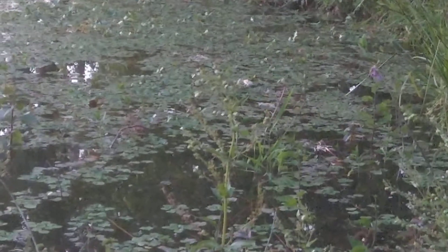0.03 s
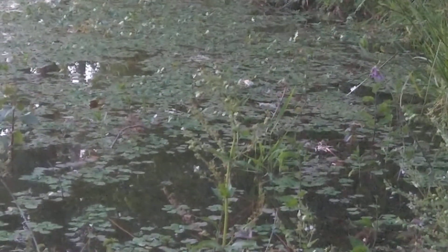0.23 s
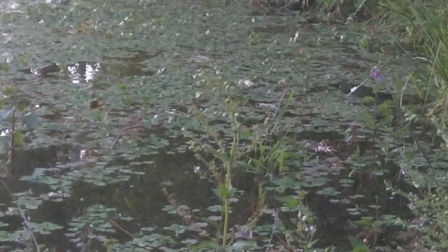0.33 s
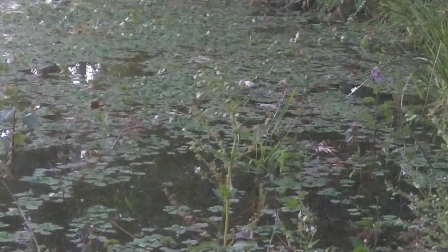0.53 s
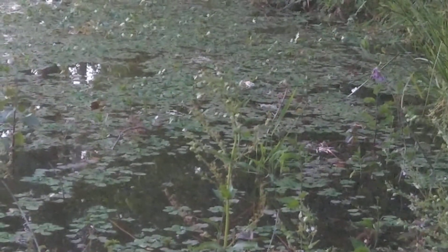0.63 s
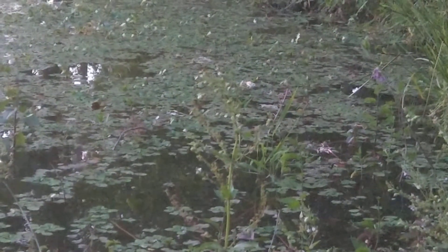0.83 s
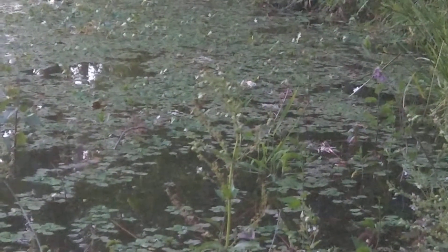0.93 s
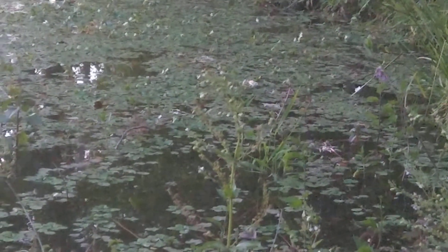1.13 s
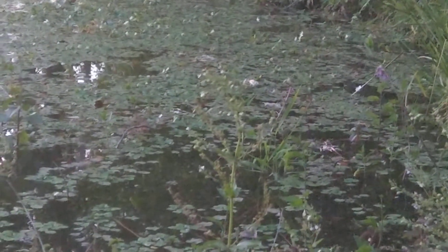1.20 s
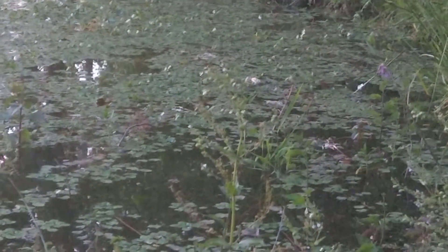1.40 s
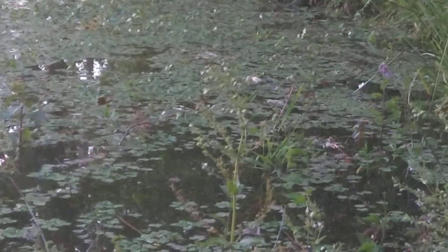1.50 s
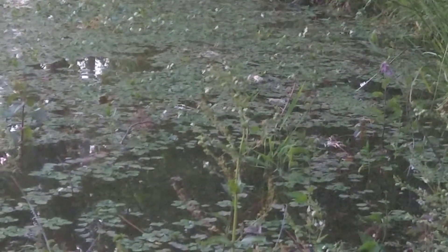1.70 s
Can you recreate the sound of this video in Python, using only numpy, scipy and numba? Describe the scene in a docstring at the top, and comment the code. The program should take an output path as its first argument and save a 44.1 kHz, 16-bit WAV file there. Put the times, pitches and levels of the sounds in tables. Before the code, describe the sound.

A frog croaks twice at the edge of a pond, each croak slowing from a buzz into harsh throbs. Other frogs give brief calls farther off, while faint crickets trill over soft outdoor air.

```python
"""Frog at the edge of a pond

A frog croaks twice: clicks of its larynx ring a throat and a vocal sac whose note rises and sinks,
and each croak slows from a buzz into a few harsh throbs. Other frogs answer farther off, crickets
trill in the reeds, soft air and a faint low hum run underneath, and the banks return a short echo."""
import sys
import numpy as np
from scipy import signal
from scipy.fft import rfft, irfft
from scipy.io import wavfile
from scipy.ndimage import uniform_filter1d, map_coordinates
from numba import njit

SR = 44100
rng = np.random.default_rng(int(sys.argv[2]) if len(sys.argv) > 2 else 0)


def int16_out(signal):
    """Quantize to a 16-bit WAV file."""
    q = np.round(np.clip(np.atleast_2d(signal).T, -1, 1) * 32767)
    wavfile.write(sys.argv[1], SR, q.astype(np.int16))


N = 77175
TIME = np.arange(N) / SR


def undb(db):
    return 10 ** (np.asarray(db) / 20)


def unit(x):
    """Scale to rms 1."""
    return x / np.sqrt(np.mean(x ** 2) + 1e-18)


def curve(rows, column=1):
    """One column of a table, joined by straight lines in time."""
    rows = np.array(rows, float)
    return np.interp(TIME, rows[:, 0], rows[:, column])


def on_bins(points, size):
    """A spectrum table read at the bins of a transform."""
    hz, value = np.array(points, float).T
    return np.interp(np.log(np.fft.rfftfreq(size, 1 / SR) + 1), np.log(hz), value)


def colour(x, points, size=4096):
    """Minimum-phase EQ through the given (Hz, dB) points."""
    cepstrum = irfft(np.log(undb(on_bins(points, size))))
    cepstrum[1:size // 2] *= 2
    cepstrum[size // 2 + 1:] = 0
    impulse = irfft(np.exp(rfft(cepstrum)))
    return signal.fftconvolve(x, impulse)[:len(x)]


@njit
def swept_bandpass(x, hz, width):
    """State-variable band-pass with a moving centre."""
    y, band, low = np.empty(len(x)), 0., 0.
    for i in range(len(x)):
        g, damping = np.tan(np.pi * hz[i] / SR), width[i] / hz[i]
        v = (band + g * (x[i] + 1e-18 - low)) / (1 + g * (g + damping))
        band, low = 2 * v - band, low + 2 * g * v
        y[i] = damping * v
    return y


def ring(x, hz, width):
    """A resonance with a steady or moving frequency and width."""
    return swept_bandpass(x, hz * np.ones(N), width * np.ones(N))


def drift(rate_hz):
    """Smooth random motion at rms 1."""
    lowpass = signal.butter(2, rate_hz, fs=SR, output="sos")
    return unit(signal.sosfilt(lowpass, rng.standard_normal(2 * N))[N:])


def place(x, pan_db, lag_s=0):
    """Two ears: the left one louder by pan_db and later by lag_s."""
    late = map_coordinates(x, [np.arange(N) - lag_s * SR], mode="nearest")
    return np.array([late * undb(pan_db / 2), x * undb(-pan_db / 2)])


def level_out(x, size=440):
    """Even out a ringing pulse train to about rms 1."""
    power = uniform_filter1d(uniform_filter1d(x ** 2, size), size // 2)
    return x / np.sqrt(np.abs(power) + power.max() / 1000)


# Tone of the open air. Each row: frequency in Hz, relative level in dB.
AIR_EQ = [(15, -21), (32, -4), (60, 3.5), (120, -3), (250, -6), (450, -6), (750, -3.5), (1100, -3),
          (1700, 0.5), (2300, -7.5), (3200, -20), (4400, -14.5), (5500, -21.5), (10000, -21), (14000, -33)]
# Stereo image of the air. Each row: frequency in Hz, likeness of the two ears from 0 to 1.
AIR_LIKENESS = [(50, 0.8), (500, 0.8), (1500, 0.48), (3000, 0.35), (8000, 0.07)]


def air(level_db=-60):
    """A soft bed of outdoor noise, narrow in the bass and wide on top."""
    alike = np.clip(on_bins(AIR_LIKENESS, N), 0, 1)
    tone = undb(on_bins(AIR_EQ, N))
    mid, side = (irfft(rfft(rng.standard_normal(N)) * tone * np.sqrt(share), N)
                 for share in (1 + alike, 1 - alike))
    return np.array([mid + side, mid - side]) / np.std(mid) * undb(level_db + .5 * drift(4))


# Partials of the hum. Each row: harmonic number, level in dB.
HUM_PARTIALS = [(1, -68), (2, -80), (3, -91)]


def hum(hz=39.1, wander=.02):
    """A faint, wavering low hum, like an engine far away."""
    phase = 2 * np.pi * np.cumsum(hz * (1 + wander * drift(2.1))) / SR
    return sum(-undb(db + .5 * drift(6.5)) * np.sqrt(2) * np.cos(harmonic * phase)
               for harmonic, db in HUM_PARTIALS)


# Solo crickets. Each row: note in Hz, first and last strokes per second, fall over a stroke in Hz,
# base level in dB, leftward pan in dB.
CRICKET_VOICES = [(6710, 55, 53, 515, -68, 0), (7233, 53, 52, 820, -71, 3)]
# Cricket faders. Each row: time in seconds, gain on the solo trills in dB, chorus level in dB.
CRICKET_FADERS = [(0, -16, -61.5), (.45, 1.5, -62), (.75, 1, -69), (1.1, 1.5, -68.5), (1.35, -0.5, -75),
                  (1.55, -7, -79), (1.75, -3.5, -81)]
# Tone of the blurred chorus. Each row: frequency in Hz, relative level in dB.
CHORUS_EQ = [(5400, -47), (6000, -18), (6350, -12), (6800, -5), (7400, -8.5), (7800, -79), (8300, -31.5)]


def crickets(stroke_width=.2, bandwidth_hz=260):
    """Each wing stroke is a scratchy falling note; many more blur into a hiss."""
    chorus = np.array([unit(colour(rng.standard_normal(N), CHORUS_EQ)) for _ in range(2)])
    out = chorus * undb(curve(CRICKET_FADERS, column=2))
    for hz, first_rate, last_rate, fall_hz, db, pan_db in CRICKET_VOICES:
        cycles = np.cumsum(np.linspace(first_rate, last_rate, N)) / SR + rng.random()
        stroke = cycles % 1 - .5
        phase = 2 * np.pi * np.cumsum(hz - fall_hz * stroke) / SR
        gate = np.exp(-.5 * (stroke / stroke_width) ** 2)
        for ear, ear_db in enumerate((pan_db / 2, -pan_db / 2)):
            scratch = drift(bandwidth_hz / 2) * np.cos(phase) + drift(bandwidth_hz / 2) * np.sin(phase)
            out[ear] += unit(gate * scratch) * undb(db + ear_db + curve(CRICKET_FADERS))
    return out


def larynx(start, end, hz, jitter, shimmer_db):
    """One click per cycle, each with its own period and strength."""
    out, at = np.zeros(N), max(start, 0)
    for late, strong in rng.standard_normal(size=(200, 2)):
        i = int(at * SR)
        if at > end or i >= N:
            break
        taps = np.clip(i + np.arange(-7, 9), 0, N - 1)
        offset = taps - at * SR
        click = np.sinc(offset) * np.sinc(offset / 8)  # can land between samples
        out[taps] -= click * undb(shimmer_db[i] * strong)
        at += np.exp(jitter[i] * late) / hz[i]
    return out


# Distant croaks. Each row: start and length in seconds, first and last pulse rate in Hz, first and last
# sac note in Hz, sac bandwidth in Hz, level in dB, throat against sac in dB, leftward pan in dB.
FAR_CROAKS = [ (-.012, 0.028, 275, 268, 1570, 1520, 260, -46, -16.5, 9.5),
              (0.017, 0.033, 285, 264, 1560, 1540, 260, -47.5, -16, 4.5),
              (0.161, 0.029, 624, 788, 2560, 3850, 2500, -57, -2.5, 5),
              (0.563, 0.039, 462.5, 465, 1400, 1640, 500, -54.5, -6.5, 8.5),
              (1.008, 0.026, 330.5, 337, 1648, 1816, 600, -61.5, -8, 12),
              (1.098, 0.06, 213.5, 260, 1210, 1543, 129.4, -52, -10, 8),
              (1.126, 0.037, 495.4, 481, 2130, 2260, 299, -59, -0.5, 3),
              (1.326, 0.1, 350, 404.6, 970, 1200, 503, -57.5, -21, 0),
              (1.366, 0.046, 268, 291, 1380, 1750, 580, -53, -4, 2),
              (1.634, .11, 350.3, 382, 2040, 2330, 162, -62.5, -6, 6)]
# Their throat tone, thin in the bass. Each row: frequency in Hz, relative gain in dB.
FAR_THROAT_EQ = [(250, -37), (480, -1), (600, -17.5), (780, 4), (1100, -10.5), (1600, -8), (3000, -59),
                 (6000, -37.5)]


def far_frogs(jitter=.0267, shimmer_db=2.25, skirt_hz=1200):
    """Short gliding croaks: clicks ring a sac and a throat under a single swell."""
    out = 0
    for start, length, hz0, hz1, sac0, sac1, width, db, throat_db, pan_db in FAR_CROAKS:
        end = start + length
        pulse_hz = curve([(start, hz0), (end, hz1)])
        clicks = larynx(start, end, pulse_hz, np.full(N, jitter), np.full(N, shimmer_db))
        sac_hz = curve([(start, sac0), (end, sac1)])
        sac = level_out(ring(ring(clicks, sac_hz, width), sac_hz, skirt_hz))
        throat = undb(throat_db) * level_out(colour(clicks, FAR_THROAT_EQ))
        progress = np.clip((TIME - start) / length, 0, 1)
        swell = np.sqrt(np.abs(np.sin(np.pi * progress)))
        out += place((sac + throat) * swell * undb(db), pan_db)
    return out


# Steady resonances beside the sac's note. Each row: frequency in Hz, bandwidth in Hz, gain in dB.
SAC_MODES = [(1400, 170, -11), (1660, 80, -6), (2300, 220, -16), (2830, 160, -25)]
# What the skin of the sac lets out. Each row: frequency in Hz, relative gain in dB.
SKIN_EQ = [(500, -16.5), (1050, -3.5), (1350, 4.5), (1700, 3), (2200, -0.5), (2600, -12), (3000, -7),
           (3500, -8), (5500, -51)]


def vocal_sac(clicks, note_hz, drive, rest_hz=1570, rest_width_hz=90, rest_skirt_hz=1200):
    """The sac rings on a gliding note through its skin; the ring gets shorter as the note rises."""
    rise = note_hz / rest_hz
    note = ring(clicks, note_hz, rest_width_hz * rise ** 3.1)
    modes = sum(undb(db) * ring(clicks, hz, width) for hz, width, db in SAC_MODES)
    voiced = level_out(colour(note + modes, SKIN_EQ)) * drive
    return ring(voiced, note_hz, rest_skirt_hz * rise)


# Tone of the upper buzz. Each row: frequency in Hz, relative gain in dB.
BUZZ_EQ = [(1500, -34), (2700, 1.5), (3300, -7), (4000, 3), (4450, 14.5), (4750, 0.5), (5200, -16),
           (9000, -48), (14000, -44)]


def upper_buzz(clicks, drive, level_db=-56, at_drive_db=-33, growth=.91):
    """A thin, bright edge on the clicks that follows the smoothed drive of the sac."""
    swell = (uniform_filter1d(drive, 1500) / undb(at_drive_db)) ** growth
    return level_out(colour(clicks, BUZZ_EQ)) * undb(level_db) * swell


# Throbs that end the croaks. Each row: centre and half length in seconds, sac and throat drive in dB.
CROAK_THROBS = [(0.389, 0.0062, -30.5, -44), (0.398, 0.0081, -29, -50.5), (.429, 0.005, -26, -38),
                (0.44, 0.002, -26, -41.5), (.451, 0.0015, -26, -37.5), (.467, 0.0024, -33, -37.5),
                (.848, 0.0083, -28, -43), (0.888, 0.0082, -28.5, -43), (0.927, 0.0054, -28.5, -44.5),
                (0.941, 0.0083, -36.5, -43)]


def effort(swell, column):
    """A croak's slow swell with the closing throbs on top: column 1 drives the sac, 2 the throat."""
    throb_power = 0
    for centre, half_length, *drive_db in CROAK_THROBS:
        bump = np.exp(-.5 * ((TIME - centre) / half_length) ** 2)
        throb_power += (undb(drive_db[column - 1]) * bump) ** 2
    return np.sqrt(undb(curve(swell, column)) ** 2 + throb_power)


# Pitch of the near frog, one list per croak. Each row: time in seconds, pulse rate in Hz.
CROAK_PITCH = [
    [(.186, 345.4), (.204, 429.5), (.224, 393.4), (.243, 420.6), (.27, 428.4), (.287, 359.7), (.308, 315.6),
     (.325, 341), (.342, 285.4), (.357, 317.6), (.374, 246.3), (.39, 281), (.413, 216.8), (.43, 290.4),
     (.447, 265), (.475, 284.5)],
    [(.676, 265.7), (.694, 310.8), (.706, 299), (.726, 406.2), (.738, 340.5), (.753, 415.6), (.768, 334.5),
     (.804, 343.3), (.82, 243.5), (.845, 322), (.865, 213), (.887, 288.8), (.905, 225.9), (.928, 440.7),
     (.938, 310.4), (.95, 272.1)],
]
# Slow swell, one list per croak. Each row: time in seconds, sac drive in dB, throat drive in dB.
CROAK_SWELL = [
    [(.184, -55, -69), (.2, -41, -47), (.274, -41.5, -48), (.31, -36.5, -49.5), (.34, -36, -51.5),
     (.362, -30, -43), (.38, -34, -51), (.412, -36, -47.5), (.44, -44, -67), (.478, -45.5, -54.5)],
    [(.674, -53, -66), (.686, -41, -52.5), (.73, -37.5, -49.5), (.765, -37.5, -51), (.802, -33.5, -45),
     (.828, -36, -51.5), (.862, -38, -63), (.875, -43.5, -62), (.91, -41, -61), (.952, -48, -64)],
]
# Glide of the vocal sac, one list per croak. Each row: time in seconds, note in Hz.
SAC_GLIDE = [
    [(.19, 1650), (.21, 1740), (.228, 1885), (.27, 1980), (.312, 2234), (.345, 2080), (.365, 1750),
     (.393, 1584), (.475, 1720)],
    [(.68, 1540), (.7, 1747), (.726, 1870), (.755, 1970), (.805, 2060), (.845, 1830), (.86, 1780),
     (.89, 1595), (.95, 1566)],
]
# Unevenness of the clicks. Each row: time in seconds, roughness from 0 to 1.
ROUGHNESS = [(.19, 0.2), (.232, 0.04), (.25, 0.83), (.275, 0.36), (.33, 0.28), (.42, 0.44), (.46, 0.51),
             (.68, 0.31), (.8, 0.17), (.86, 0.37), (.93, 0.57)]
# Throat tone of the near frog. Each row: frequency in Hz, relative gain in dB.
THROAT_EQ = [(150, -58), (290, -22), (400, 4), (550, -2), (830, 4.5), (1100, -5.5), (1500, -13.5),
             (2500, -50.5), (6000, -80)]


def near_frog(full_jitter=.0553, full_shimmer_db=4.5):
    """Larynx clicks ring the throat and the swelling sac; returns this body and the buzz apart."""
    body, buzz, rough = 0, 0, curve(ROUGHNESS)
    for pitch, swell, glide in zip(CROAK_PITCH, CROAK_SWELL, SAC_GLIDE):
        start, end = pitch[0][0], swell[-1][0]
        clicks = larynx(start, end, curve(pitch), full_jitter * rough, full_shimmer_db * rough)
        sac_drive, throat_drive = effort(swell, column=1), effort(swell, column=2)
        throat = level_out(colour(clicks, THROAT_EQ)) * throat_drive
        body += vocal_sac(clicks, curve(glide), sac_drive) + throat
        buzz += upper_buzz(clicks, sac_drive)
    return place(body, pan_db=.4, lag_s=.00005), place(buzz, pan_db=3, lag_s=.000075)


# EQ on the echo return. Each row: frequency in Hz, gain in dB.
ECHO_EQ = [(300, 2), (700, -10.5), (1100, 3), (1700, 3.5), (2200, 11.5), (3000, 13.5), (4500, 8),
           (8000, 23)]


def reflections(send, t60_s, delay_s=0):
    """Diffuse reflections from plants or banks, different at each ear."""
    decay = undb(-60 * TIME / t60_s) * (TIME > delay_s)
    tails = [colour(unit(rng.standard_normal(N) * decay), ECHO_EQ) for _ in range(2)]
    mono = send.mean(axis=0)
    return np.array([signal.fftconvolve(mono, tail)[:N] for tail in tails]) / np.sqrt(N)


def scene():
    """Frogs and their reflections over a bed of crickets, hum and air."""
    body, buzz = near_frog()
    near, far = body + buzz, far_frogs()
    plant_scatter = undb(-16) * reflections(body, t60_s=.017)
    reed_scatter = undb(-.5) * reflections(buzz, t60_s=.25)  # reeds scatter the buzz much more
    bank_echo = reflections(undb(-17) * near + undb(-10) * far, t60_s=.69, delay_s=.016)
    return near + far + plant_scatter + reed_scatter + bank_echo + crickets() + hum() + air()


def record(dry):
    """A steep high cut on the whole mix."""
    cutoff_hz = 14230
    return signal.sosfilt(signal.ellip(10, .2, 70, cutoff_hz, fs=SR, output="sos"), dry)


dry = scene()
out = record(dry)
int16_out(out)
```